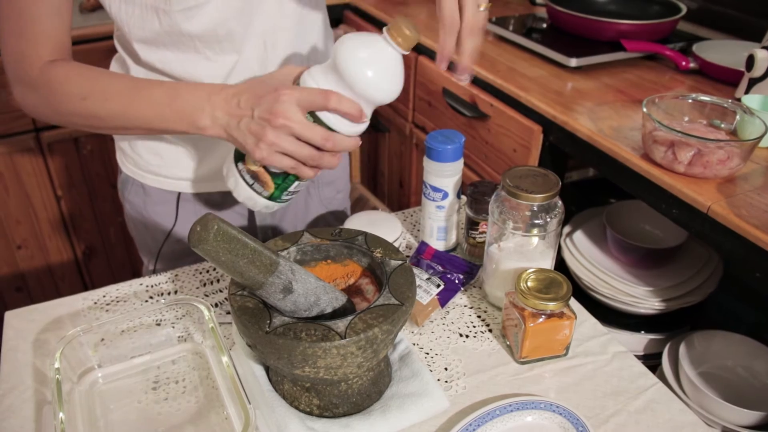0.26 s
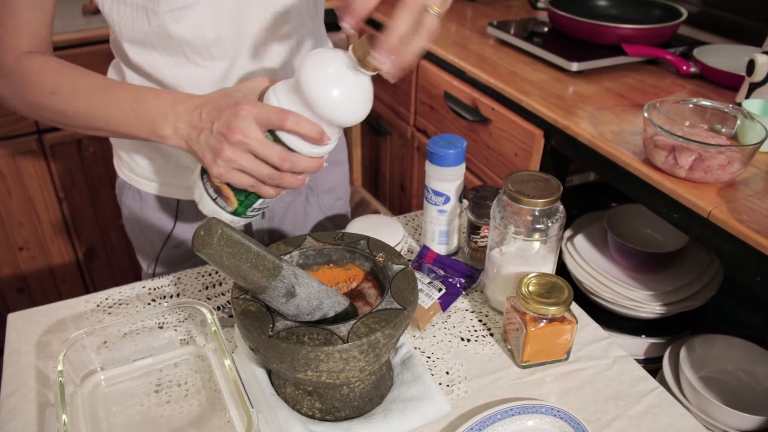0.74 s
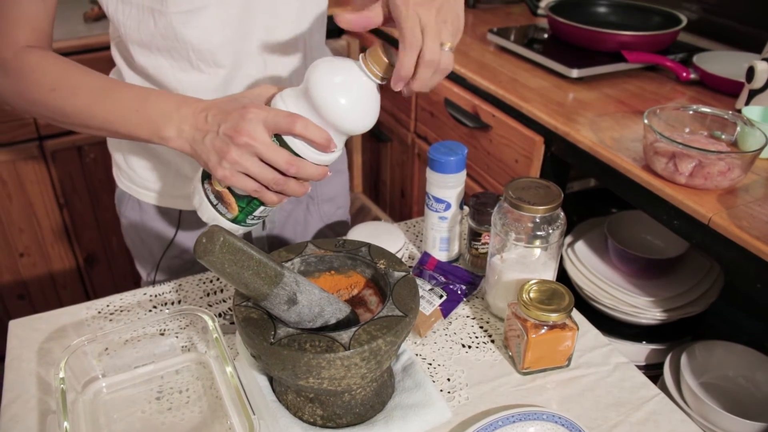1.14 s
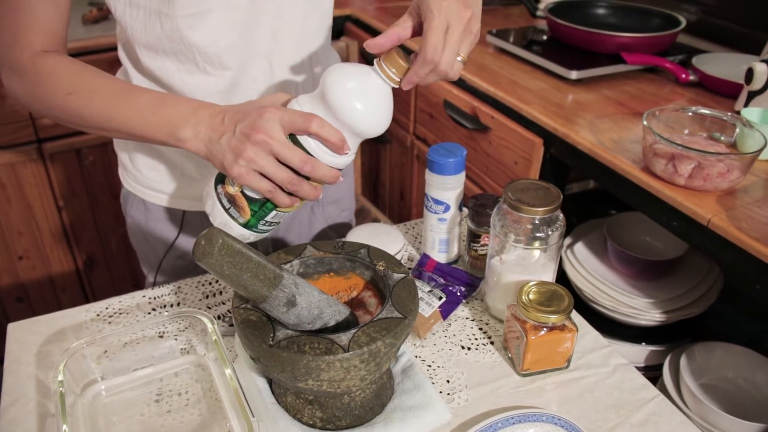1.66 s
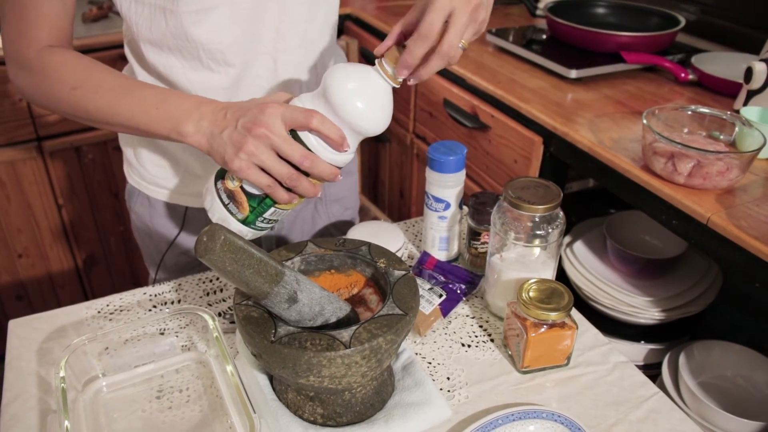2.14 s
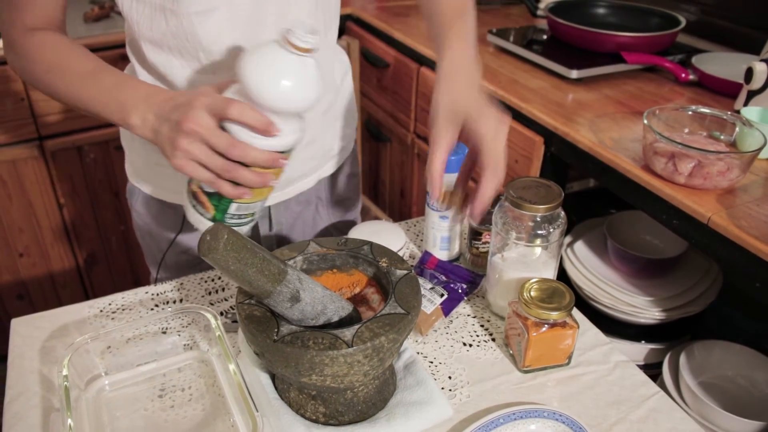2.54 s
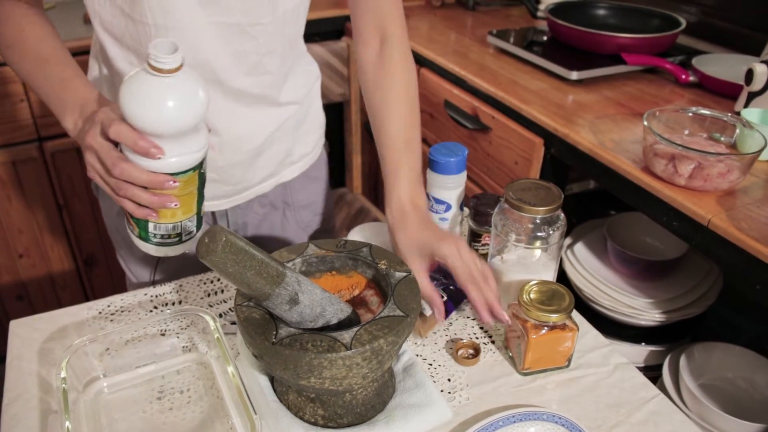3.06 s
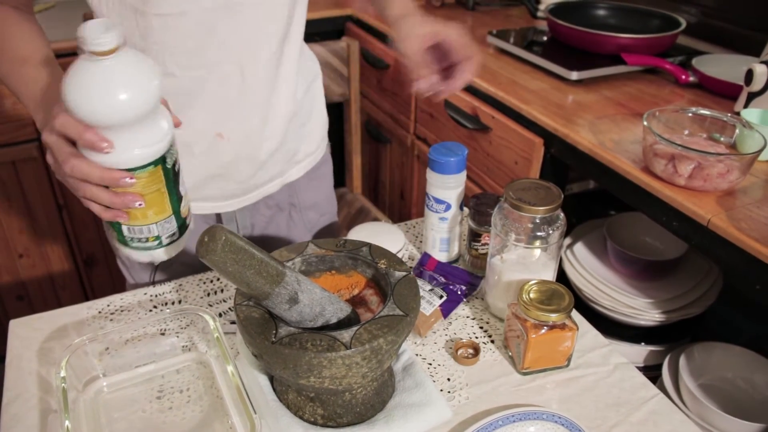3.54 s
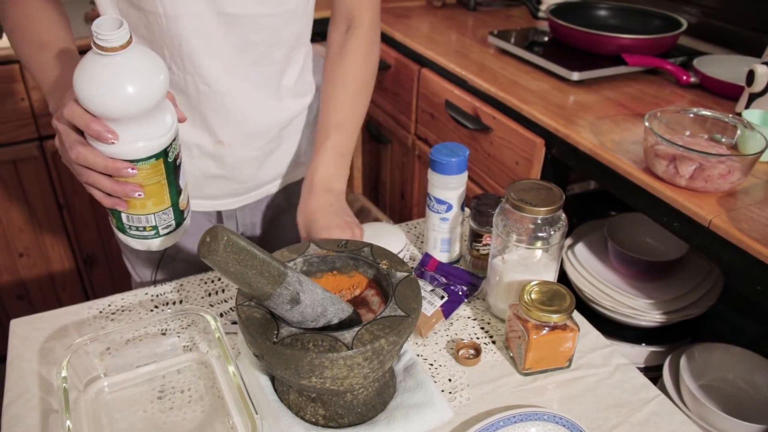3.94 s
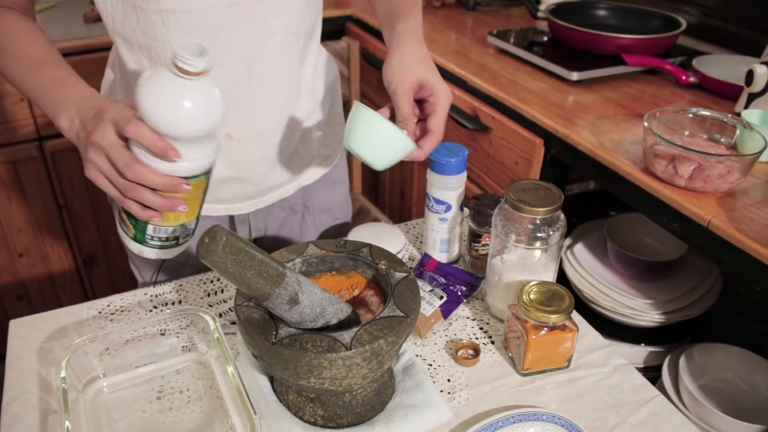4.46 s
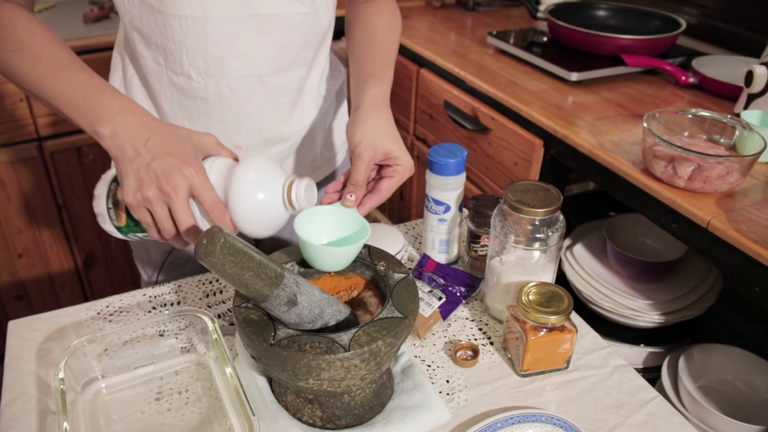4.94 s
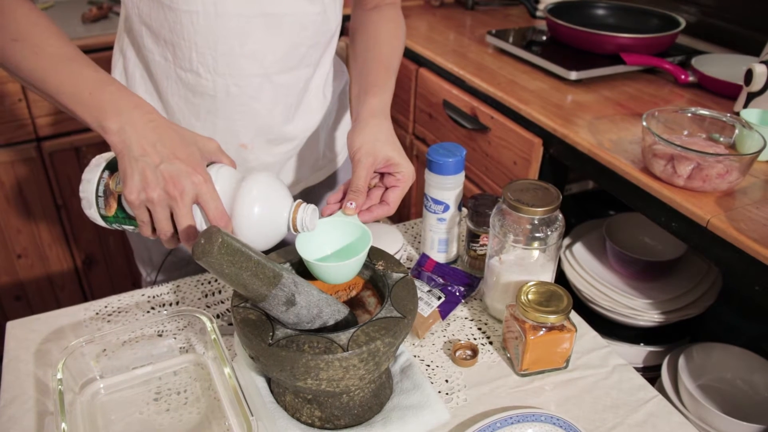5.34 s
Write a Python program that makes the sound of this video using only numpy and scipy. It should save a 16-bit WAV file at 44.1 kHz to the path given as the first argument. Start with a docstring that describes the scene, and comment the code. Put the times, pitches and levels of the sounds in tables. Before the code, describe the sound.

A quiet home kitchen, heard close in stereo, with low rumble, faint hum and soft hiss throughout. From 0 to 2.2 seconds a plastic screw cap is turned in short separate twists: dry, grainy thread scrapes, tiny mid-high clicks and faint skin slips, with dull palm thumps from the full bottle. A single sharp snap at 1.1 stands far above the rest; smaller clicks cluster at 1.4, 1.8 and around 2.0 to 2.2. Finger ticks follow near 2.5, then the cap lands softly on the table at 2.95 to 3.05. Cloth rustles gently around 3.45, with a bright nail tick. At 4.0 a small plastic cup is touched and lifted with light hisses and taps. Faint knocks and barely audible liquid hums come at 4.6 to 4.8. The bottle neck hits the cup loudly at 5.13, a short hollow pop, with smaller knocks near 5.5. Room decay is brief.

```python
"""A quiet kitchen: a plastic screw cap is twisted off a bottle, is laid on the table, and a small cup is taken.
The thread scrapes by stick-slip and snaps as short pushes that ring the modes of the cap; the bottle neck
knocks on the cup's rim and rings its plastic bowl. Skin hisses, nails tick, the palm thumps, cloth rustles and
sloshing liquid hums in the tipped bottle. A hard-walled room returns each sound as decaying noise,
over low house rumble, hums and hiss."""
import sys
import numpy as np
from scipy import signal
from scipy.fft import rfft, irfft, next_fast_len
from scipy.io import wavfile
from scipy.ndimage import uniform_filter1d

SR = 44100
rng = np.random.default_rng(int(sys.argv[2]) if len(sys.argv) > 2 else 0)


def master(y):
    """Save y as 16-bit WAV."""
    cut = np.clip(np.atleast_2d(y).T, -1, 1)
    pcm = np.round(cut * 32767)  # scale
    wavfile.write(sys.argv[1], SR, pcm.astype(np.int16))


N = 246546

# Source levels hold ahead of room and balance; mode levels are relative within a body.
# Background noise spectrum: (frequency [Hz], relative spectral level [dB])
HUSH_SPECTRUM = [(9, -24.5), (16, -4), (37, -11.5), (166, -16), (215, -17.5), (248, -16), (320, -19.5),
                 (450, -23.5), (714, -29), (1230, -37.5), (4860, -50.5), (11600, -54), (12400, -70),
                 (16000, -74.5)]
# Stereo width of that noise: (frequency [Hz], side minus mid [dB])
HUSH_WIDTH = [(30, -12), (250, -19.5), (2000, -4), (10000, 3)]
# Wavering low hums: (frequency [Hz], width [Hz], level [dB])
HUMS = [(26.76, 6.9, -69), (56, 1.7, -73)]
# Room tail by band: (centre [Hz], T60 [s], relative level [dB], side minus mid [dB])
ROOM_BANDS = [(250, .5, -5, -20), (700, 0.39, -8, -20), (1545, 0.36, -4.5, -9), (3280, 0.23, -11, 2.5),
              (7000, 0.3, -6, 4), (12000, 0.37, -8, -1.5)]
# Liquid in the tipped bottle: (time [s], start pitch [Hz], end pitch [Hz], peak level [dB], length [s])
SLOSHES = [(4.635, 875, 885, -71, .07), (4.79, 665, 690, -67, .095)]
# Rustle of sleeve and arm: (time at full force [s], level [dB], hold [s], fade [dB/s])
CLOTH_STROKES = [(2.5, -81.5, .02, 42), (2.72, -78, 0.0096, 60.5), (2.96, -80.5, 0.11, 179.5),
                 (3.45, -71, .01, 101), (3.85, -87, 0.09, 27), (4.1, -84.5, 0.023, 18),
                 (4.6, -84, 0.018, 102)]
# Palm thumps on the full bottle: (time [s], peak level [dB])
PALM_THUMPS = [(0.193, -49), (0.904, -40.5), (1.091, -50), (1.341, -59.5), (1.743, -57), (1.776, -53),
               (2.049, -50), (2.211, -51), (5.125, -45.5)]
# Full bottle, one group of modes: (frequency [Hz], width [Hz], level [dB])
BOTTLE_MODES = [
    [(70, 61.06, -7), (172.9, 550, -2), (258, 650, -8.5)],
]
# Fingertip ticks: (time [s], peak level [dB], pitch [Hz])
FINGER_TICKS = [(0.46, -63, 4400), (0.477, -67, 4380), (0.4948, -56.5, 6090), (2.4423, -58, 4050),
                (2.536, -56.5, 4240), (3.4064, -48, 12080), (3.5037, -63.5, 9900), (3.614, -77, 7080),
                (3.9298, -67, 11160), (4.2391, -59.5, 4065)]
# Fingers sliding on plastic: (time at full force [s], force level [dB], hold [s], fade [dB/s],
# hiss centre [Hz], cup ring re force [dB])
FINGER_SLIDES = [(2.443, -82.5, 0.0031, 149.5, 4310, -15.5), (2.535, -73.5, .003, 450, 4370, -20.5),
                 (3.414, -81.5, 0.0022, 160.5, 11090, -10.5), (3.978, -88.5, 0.024, 301, 6500, 2),
                 (4.015, -79, 0.015, 132.5, 7700, 10.5), (4.085, -89.5, 0.0059, 298, 8500, -14.5),
                 (4.266, -83, .05, 198.5, 8400, -19.5), (4.377, -83, 0.02, 300.5, 6500, -11),
                 (4.414, -79, 0.0099, 899.5, 6040, -11), (4.507, -85, 0.0029, 250.5, 8390, -8),
                 (4.598, -77.5, 0.018, 300, 6770, 1), (4.63, -69, 0.0027, 601.5, 6230, 2),
                 (4.752, -74.5, 0.0055, 498, 5950, 1), (4.947, -86, 0.0033, 94, 6310, -5.5),
                 (5.109, -79, 0.0085, 1492.5, 6130, 3)]
# Cup knocks: (time [s], wall peak [dB], hollow re wall [dB], brightness re wall [dB], favoured pitch [Hz],
# chatter [ms])
CUP_KNOCKS = [(4.0095, -39, -17, -8, 1893, 2.5), (4.627, -47, -12.5, -17.5, 902, 7.1),
              (4.633, -45, -16.5, -11.5, 1860, 4), (4.749, -47, -30, 0.5, 1480, 5),
              (4.756, -46.5, -33.5, -1, 1222, 4.1), (5.125, -9, -13, -18, 1480, 0.86),
              (5.132, -39, -25, -37, 1520, .8), (5.149, -25, -5, -24, 1290, 0.44),
              (5.489, -25, -42.5, -33, 1534, .3), (5.518, -40.5, -14, -9.5, 1870, 0.95),
              (5.545, -45.5, -14.5, -23.5, 1820, .6)]
# Cup, groups low, wall, lip, edge: (frequency [Hz], width [Hz], level [dB])
CUP_MODES = [
    [(423, 200, -8), (555, 225, 2.5)],
    [(885, 125, 5), (1148, 200, -1), (1495, 241, -3.5), (1713, 277, -2.5), (1895, 262, -3.5)],
    [(2580, 1020, -3), (3500, 1500, -9), (4285, 190, 4.5), (4930, 350, -5.5)],
    [(6500, 600, 0), (7780, 147, 0), (8750, 530, -1.5), (12200, 620, -29)],
]
# Cap laid on the table: (time [s], low-mode peak [dB], edge re that peak [dB])
CAP_LANDINGS = [(2.952, -45.5, -32.5), (2.974, -56.5, -28), (3.048, -51.5, -15)]
# Cap shuffling on the tablecloth before the fingers let go: (time at full force [s], level [dB], hold [s],
# fade [dB/s])
CLOTH_SHUFFLE = [(2.965, -74, .003, 75)]
# Table, groups low and edge: (frequency [Hz], width [Hz], level [dB])
TABLE_MODES = [
    [(520, 270, 0.5), (767, 216, -3.5), (1098, 160, -7), (1560, 335, -15)],
    [(3200, 1400, -11.5), (4200, 1220, 7.5)],
]
# Fingertips slipping over the cap's ribs: (time at full force [s], level [dB], hold [s], fade [dB/s])
RIB_SLIPS = [(0.0, -82.5, .08, 102), (0.11, -90, 0.024, 152), (0.21, -79, 0.017, 298),
             (0.555, -73.5, 0.011, 101), (0.65, -83, 0.004, 402), (0.98, -80, 0.017, 151),
             (1.435, -59.5, 0.025, 213), (1.995, -76, 0.01, 301.5), (2.15, -76.5, 0.01, 250)]
# Turns of the wrist: (time at full force [s], force level [dB], hold [s], fade [dB/s],
# bottle body re force [dB], rim re force [dB], favoured pitch [Hz])
WRIST_TURNS = [(0.0, -65.5, 0.15, 302, -8, -8, 2360), (0.197, -58, 0.0023, 420, -6, -11.5, 2200),
               (0.477, -79, 0.0047, 300, 3.5, -10, 2230), (0.562, -51.5, .003, 175, -12.5, -8.5, 2480),
               (0.646, -63, .003, 284, -6.5, -9, 2200), (0.97, -57, .003, 244, -7.5, -13.5, 2300),
               (1.064, -64, 0.0036, 273, 0.5, -7, 1530), (1.344, -79.5, 0.046, 295.5, 0, -7.5, 1960),
               (1.431, -49.5, 0.011, 111, -4.5, -18.5, 2685), (1.962, -63.5, 0.051, 145, 2, -25.5, 2220),
               (2.121, -61, 0.019, 206, 0.5, -16.5, 1900), (2.132, -59, 0.0024, 288.5, -14, -17, 2830),
               (2.197, -71.5, 0.018, 350.5, 9.5, -21.5, 2090)]
# Cap snaps: (time [s], shell peak [dB], bottle body re shell [dB], rim re shell [dB], edge re shell [dB],
# favoured pitch [Hz])
CAP_SNAPS = [(0.1011, -61.5, -16, 13.5, 17.5, 4200), (0.1345, -49.5, -8, -15, -26, 2380),
             (0.1994, -50, -11, -18, -0.5, 2260), (0.266, -51.5, -7, -11, -31, 2130),
             (0.514, -53, -10, -5, -27, 2230), (0.5484, -46, -15, -4.5, -8, 2500),
             (0.561, -41, -23, -22, -26, 2810), (0.5804, -44, -25, -19, -28, 2270),
             (0.647, -42, -12, -23, -24, 1820), (0.8711, -61, 1, -5, -3, 2200),
             (0.904, -45.5, 1, -30, -9, 2700), (0.9715, -51.5, -28, 4.5, -30, 4200),
             (1.0874, -12.5, -11.5, -2.5, -9, 3100), (1.3415, -39.5, -10.5, -8.5, -12.5, 2120),
             (1.4124, -40, -23, -24, -38, 2050), (1.4243, -38.5, -2, -21, -25.5, 2090),
             (1.4356, -35.5, -29, 1.5, -29, 4260), (1.4896, -43.5, -0.5, -24, -17, 2030),
             (1.5434, -54.5, 4.5, -16, -24.5, 2810), (1.7464, -48, -2.5, -10.5, -21.5, 2200),
             (1.773, -28, -15.5, -7.5, -19.5, 2320), (1.9508, -44, -10, -23.5, -46, 3940),
             (1.985, -44, -15, -19, -26, 1914), (1.9939, -49, 5.5, -8, 0, 1297),
             (2.0013, -41, -22, -3.5, -27, 3000), (2.0186, -37, -8, -26, -37, 2110),
             (2.0487, -35, -8, -6, -40, 2920), (2.1165, -48, 5, -22, -22, 1366),
             (2.1273, -44, -6.5, -29, -29, 1727), (2.151, -38.5, -27, -8.5, -27, 4100),
             (2.1844, -45.5, 1.5, -28, -32.5, 2620), (2.2017, -44, -1, -36, -39, 1345),
             (2.2183, -43, -13, -13, -20, 2940)]
# Cap and bottle, groups body, shell, rim, edge: (frequency [Hz], width [Hz], level [dB])
CAP_MODES = [
    [(487.8, 120, 2), (768, 79, 0.5), (976, 250, -1)],
    [(1203.7, 380, -5.5), (1480, 290, 2), (1867, 340, 0), (2200, 300, 0.5), (2700, 220, 0.5),
     (3100, 190, -0.5), (3506, 350, 1), (4156, 160, 0)],
    [(4740, 690, 3.5), (6292, 490, 1.5)],
    [(7600, 2800, 5.5), (9100, 180, -8.5), (12190, 4500, -3.5)],
]

HUSH_DB = -66.5  # RMS level of the mid noise, without the hums
CLUTTER_T60_S, CLUTTER_DB = 0.099, 0.5  # jars, worktop and body scatter first echoes; dB above the tail
GLANCE_MS, GLANCE_HZ, GLANCE_DB = 0.35, 4370, -12.5  # delayed treble glancing off the table
BALANCE_DB = -1.3  # first channel minus second
TOP_HZ = 16300
RUSTLE_RISE_DB_PER_S, SLIDE_RISE_DB_PER_S = 111, 477
TWIST_RISE_DB_PER_S, SLIP_RISE_DB_PER_S = 401, 508
CUP_TAKEN_S = 3.6
KNOCK_EDGE_DB = -2.5  # edge peak re lip peak
SNAP_CHATTER_MS, SET_DOWN_CHATTER_MS = 0.6, 3.1


def undb(db):
    """Level definition: decibels become an amplitude ratio."""
    return 10 ** (np.asarray(db) / 20)


def unit(x):
    """Normalisation: scale a signal to an RMS of one."""
    return x / np.sqrt(np.mean(x ** 2))


def add(out, s, sound):
    """Superposition: add a sound to the output at a time in seconds."""
    at = int(s * SR)
    out[at:at + len(sound)] += sound[:N - at]


def shaped(points, size):
    """Spectral shaping: white noise is weighted by (Hz, dB) points joined over log frequency."""
    hz, db = np.transpose(points)
    f = np.maximum(np.fft.rfftfreq(size, 1 / SR), 1)
    gain = undb(np.interp(np.log(f), np.log(hz), db))
    return irfft(rfft(rng.standard_normal(size)) * gain, size)


def ring(x, modes):
    """Modal superposition: resonances of alternating sign, with little radiated beyond the outer ones."""
    total = 0
    for k, (hz, width, db) in enumerate(modes):
        b, a = signal.iirpeak(hz, hz / width, SR)
        total = total + (-1) ** k * undb(db) * signal.lfilter(b, a, x)
    edges = [modes[0][0] / 1.35, min(modes[-1][0] * 1.55, 0.45 * SR)]
    return signal.sosfilt(signal.butter(2, edges, "band", fs=SR, output="sos"), total)


def favour(modes, hz, octaves):
    """Modal excitation: the place of the blow decides which modes ring most."""
    return [(f, width, db - min(6 * (np.log2(f / hz) / octaves) ** 2, 13.0)) for f, width, db in modes]


def blows(rows, groups, contact_ms, rough):
    """Impact excitation: a short push and its chatter ring every mode group.

    Rows are (s, favoured Hz, chatter ms, peak dB of each group); only the first group favours a pitch."""
    out = np.zeros(N)
    ms = 1000 * np.arange(4096) / SR
    chances = rng.standard_normal((len(rows), len(ms)))
    for (s, hz, chatter_ms, *dbs), chance in zip(rows, chances):
        push = ms / contact_ms * np.exp(-ms / contact_ms)
        push += rough * chance * np.exp(-ms / max(chatter_ms, 0.05))
        for k, (db, modes) in enumerate(zip(dbs, groups)):
            sound = ring(push, favour(modes, hz, octaves=0.4) if k == 0 else modes)
            if k == 3:
                # fourth group is added with opposite sign, keeping the treble between its neighbours full
                sound = -sound
            add(out, s, undb(db) * sound / np.abs(sound).max())
    return out


def grit(rate, spread_db, smooth):
    """Stick-slip friction: random slips (rate per s) of very uneven size over a smooth rub."""
    happens = rng.random(N) < rate / SR
    size = undb(spread_db * rng.exponential(size=N))
    slips = happens * size * rng.standard_normal(N)
    return unit(slips) + smooth * rng.standard_normal(N)


def strokes(rows, rise):
    """Friction force: per row (s, dB, hold s, fade dB/s), a gain that rises, holds and fades linearly in dB."""
    s, db, hold, fade = np.array(rows)[:, :4, None].transpose(1, 0, 2)
    t = np.arange(0, N + 64, 64) / SR  # one gain value per 64 samples
    before = np.maximum(s - t, 0)
    after = np.maximum(t - s - np.abs(hold), 0)
    gain = undb(db - rise * before - np.abs(fade) * after)
    return np.repeat(gain, 64, axis=1)[:, :N]


def hush():
    """Stationary noise: house rumble and hiss are shaped noise, hums narrow resonances; mid and side."""
    hz, db = np.transpose(HUSH_SPECTRUM)
    width_hz, width_db = np.transpose(HUSH_WIDTH)
    side_db = db + np.interp(np.log(hz), np.log(width_hz), width_db)
    size = next_fast_len(N)
    mid = shaped(HUSH_SPECTRUM, size)
    side = shaped(np.transpose([hz, side_db]), size)
    gain = undb(HUSH_DB) / np.std(mid)
    hum = sum(undb(level) * unit(ring(rng.standard_normal(N), [(f, width, 0)])) for f, width, level in HUMS)
    return gain * mid[:N] + hum, gain * side[:N]


def room(x):
    """Reverberation: dense near scatter, then a tail that dies band by band; mid and side."""
    t = np.arange(SR * 3 // 4) / SR
    mid, side = np.zeros(len(t)), np.zeros(len(t))
    for hz, t60, db, side_db in ROOM_BANDS:
        fade = 10 ** (-3 * t / t60) + undb(CLUTTER_DB) * 10 ** (-3 * t / CLUTTER_T60_S)
        fade *= 1 - np.exp(-t / 0.0015)  # soft onset
        fade *= undb(db) / np.sqrt(np.sum(fade ** 2))
        band = signal.butter(2, [hz / 1.5, hz * 1.5], "band", fs=SR, output="sos")
        mid += fade * signal.sosfilt(band, rng.standard_normal(len(t)))
        side += undb(side_db) * fade * signal.sosfilt(band, rng.standard_normal(len(t)))
    return [signal.fftconvolve(x, response)[:N] for response in (mid, side)]


def liquid():
    """Trapped-air oscillation: air held by the moving liquid hums unevenly on a gliding pitch."""
    out = np.zeros(N)
    for s, start_hz, end_hz, db, length in SLOSHES:
        part = np.arange(int(length * SR)) / (length * SR)
        waver = uniform_filter1d(rng.standard_normal(len(part)), size=400)
        swell = np.sin(np.pi * part) * (1 + 0.3 * unit(waver))
        phase = 2 * np.pi * np.cumsum(start_hz + (end_hz - start_hz) * part) / SR
        add(out, s, undb(db) * swell * np.sin(phase))
    return out


def rustle():
    """Fibre friction: many uneven slips of sleeve and arm, broadly resonant, swell with the swinging arm."""
    cloth = ring(grit(rate=6000, spread_db=5.0, smooth=1.9), [(454, 120, -1), (2200, 13000, -25.0)])
    return strokes(CLOTH_STROKES, RUSTLE_RISE_DB_PER_S).sum(axis=0) * unit(cloth)


def palm_thumps():
    """Soft impact: the palm rings the low, broad modes of the full bottle."""
    rows = [(s, 140, 0.3, db) for s, db in PALM_THUMPS]
    return blows(rows, BOTTLE_MODES, contact_ms=0.13, rough=0.1)


def nail_ticks():
    """Light impact: each nail tick rings one broad resonance with a rough contact."""
    out = np.zeros(N)
    for s, db, hz in FINGER_TICKS:
        out += blows([(s, hz, 0.5, db)], [[(hz, hz / 6, 0)]], contact_ms=0.046, rough=0.97)
    return out


def sliding_fingers():
    """Sliding friction: skin hisses round a moving centre frequency and rings the cup a little."""
    force = strokes(FINGER_SLIDES, SLIDE_RISE_DB_PER_S)
    pitch, cup_db = np.array(FINGER_SLIDES).T[-2:]
    slip = grit(rate=3500, spread_db=2.0, smooth=1.0)
    centre = pitch @ force / force.sum(axis=0)  # mean pitch weighted by force
    _, wall, lip, edge = CUP_MODES
    hiss = 0
    for hz in 3200 * 2 ** np.arange(0, 1.9, 0.1):
        near = np.exp(-(np.log2(hz / centre) / 0.09) ** 2)
        band = [(hz, hz / 9, 0)]
        hiss = hiss + (undb(-21) + near) * unit(ring(ring(slip, band), band))
    # once the cup is in the hand its lip and edge sing along
    held = np.arange(N) > CUP_TAKEN_S * SR
    hiss = hiss + held * (undb(-1.5) * unit(ring(slip, edge)) + undb(-11) * unit(ring(slip, lip)))
    return force.sum(axis=0) * hiss + undb(cup_db) @ force * unit(ring(slip, wall[3:]))


def cup():
    """Impact on a thin bowl: each knock rings wall, hollow, lip and edge modes as a hollow pop."""
    low, wall, lip, edge = CUP_MODES
    rows = [(s, hz, ms, db, db + hollow, db + top, db + top + KNOCK_EDGE_DB)
            for s, db, hollow, top, hz, ms in CUP_KNOCKS]
    return blows(rows, [wall, low, lip, edge], contact_ms=0.04, rough=0.06)


def cap_laid_down():
    """Impact and friction on a plate: the landing cap rings the table, and its shuffle rubs the low modes."""
    rows = [(s, 700, SET_DOWN_CHATTER_MS, db, db + top) for s, db, top in CAP_LANDINGS]
    landings = blows(rows, TABLE_MODES, contact_ms=0.24, rough=0.16)
    rub = unit(ring(grit(rate=5000, spread_db=3.0, smooth=0.9), TABLE_MODES[0]))
    return landings + strokes(CLOTH_SHUFFLE, TWIST_RISE_DB_PER_S)[0] * rub


def fingertips_on_ribs():
    """Skin friction: fingertips slip over the cap's ribs as two broad bands of treble."""
    skin = grit(rate=5000, spread_db=3.0, smooth=0.9)
    hiss = unit(ring(skin, [(7800, 5200, -0.5), (12000, 5800, -3.5)]))
    return strokes(RIB_SLIPS, SLIP_RISE_DB_PER_S).sum(axis=0) * hiss


def thread_scrape():
    """Stick-slip in the thread: one train of slips rings shell, bottle body and rim under the turning force."""
    body, shell, rim, _ = CAP_MODES
    force = strokes(WRIST_TURNS, TWIST_RISE_DB_PER_S)
    body_db, rim_db, pitch = np.array(WRIST_TURNS).T[-3:]
    centre = pitch @ force / force.sum(axis=0)  # mean pitch weighted by force
    slip = grit(rate=1300, spread_db=2.5, smooth=0.5)
    # the grip moves round the cap and damps some modes
    shell_sound = 0
    for hz, width, db in shell:
        damping_db = 8.0 * (np.log2(hz / centre) / 0.61) ** 2
        shell_sound = shell_sound + undb(db - 3.5 - damping_db) * unit(ring(slip, [(hz, width, 0)]))
    scrape = shell_sound * force.sum(axis=0)
    scrape += undb(body_db) @ force * unit(ring(slip, body))
    scrape += undb(rim_db) @ force * unit(ring(slip, rim))
    return scrape


def cap_snaps():
    """Sudden release: where the thread lets go, a very short push rings shell, bottle body, rim and edge."""
    body, shell, rim, edge = CAP_MODES
    rows = [(s, hz, SNAP_CHATTER_MS, db, db + low, db + mid, db + top)
            for s, db, low, mid, top, hz in CAP_SNAPS]
    return blows(rows, [shell, body, rim, edge], contact_ms=0.03, rough=0.12)


def table_glance(near):
    """Reflection: treble glancing off the table arrives late, in opposite sign in the two channels."""
    treble = signal.sosfilt(signal.butter(2, GLANCE_HZ, "high", fs=SR, output="sos"), near)
    return undb(GLANCE_DB) * np.roll(treble, int(GLANCE_MS * SR / 1000))


def scene():
    """Superposition: near sources, room and background join as mid and side, then as two channels."""
    hand = rustle() + palm_thumps() + nail_ticks() + sliding_fingers()
    cap = cap_laid_down() + fingertips_on_ribs() + thread_scrape() + cap_snaps()
    near = liquid() + hand + cup() + cap
    wet, wet_side = room(near)
    air, air_side = hush()
    mid = near + wet + air
    side = wet_side + air_side + table_glance(near)
    return np.array([(mid + side) * undb(BALANCE_DB / 2), (mid - side) * undb(-BALANCE_DB / 2)])


def record(dry):
    """Band limiting: a steep elliptic low-pass cuts the top."""
    return signal.sosfilt(signal.ellip(10, 0.2, 80, TOP_HZ, fs=SR, output="sos"), dry)


dry = scene()
out = record(dry)
master(out)
```